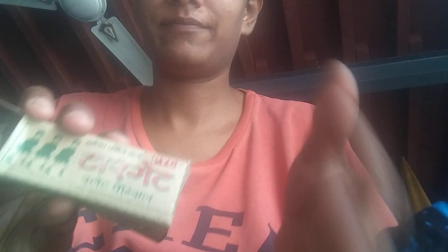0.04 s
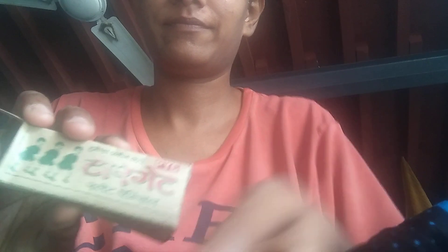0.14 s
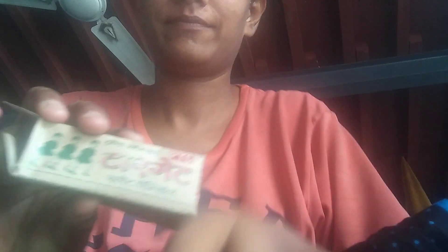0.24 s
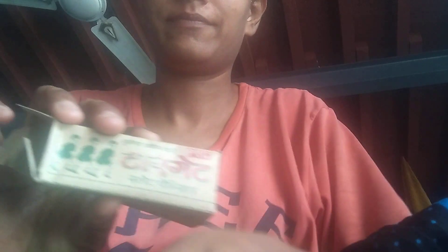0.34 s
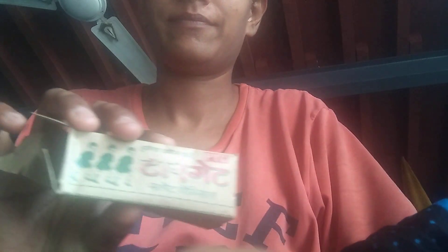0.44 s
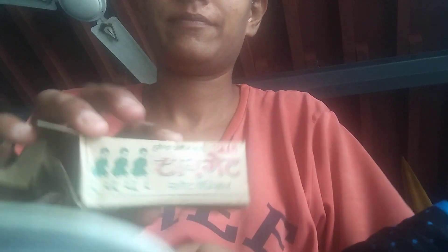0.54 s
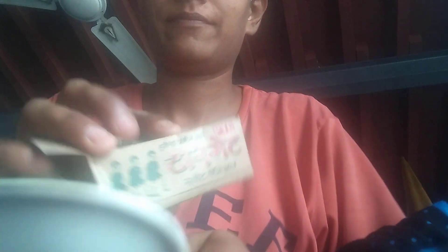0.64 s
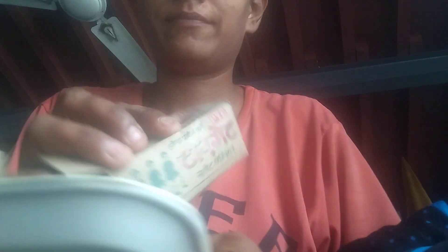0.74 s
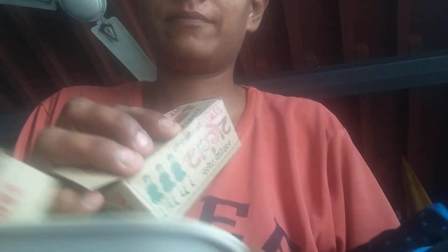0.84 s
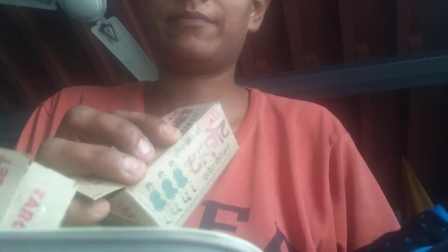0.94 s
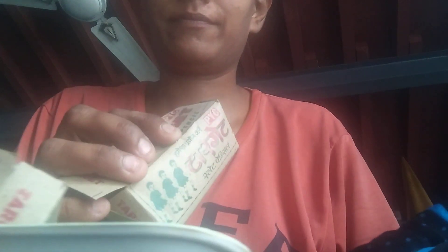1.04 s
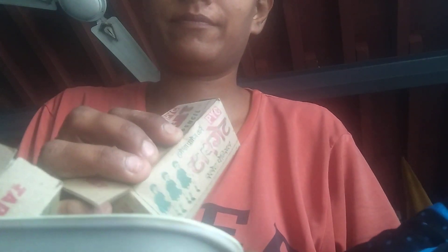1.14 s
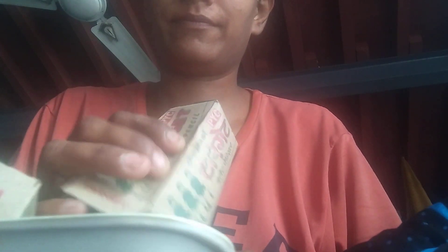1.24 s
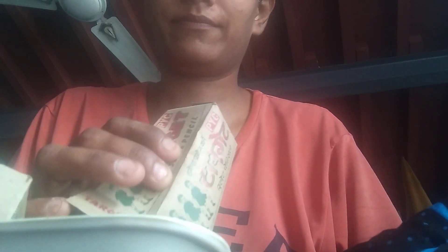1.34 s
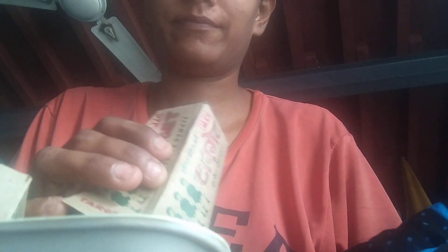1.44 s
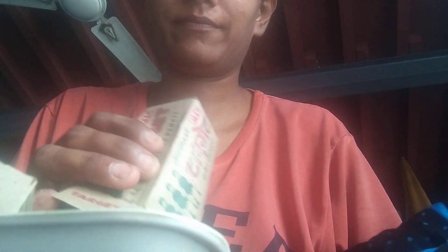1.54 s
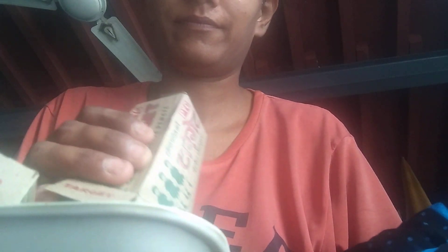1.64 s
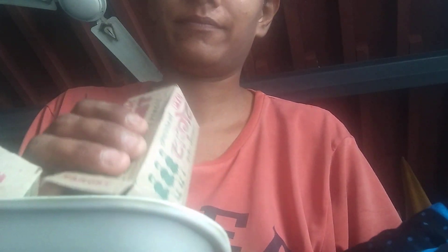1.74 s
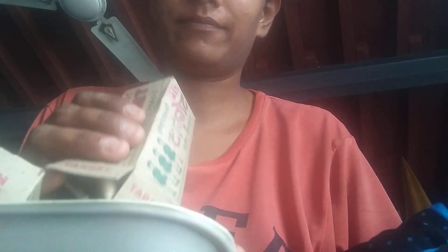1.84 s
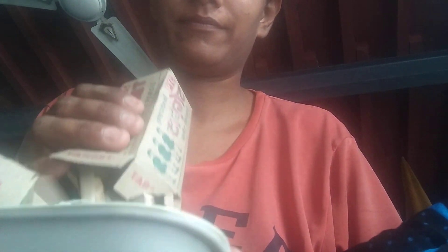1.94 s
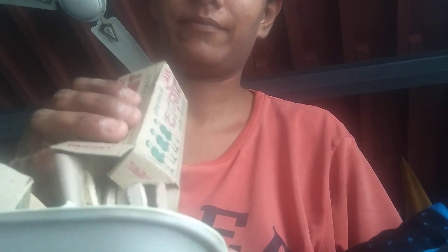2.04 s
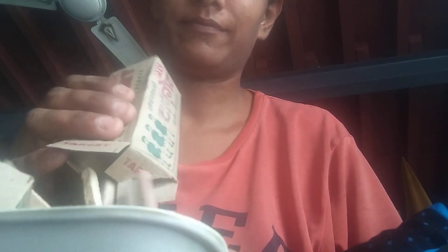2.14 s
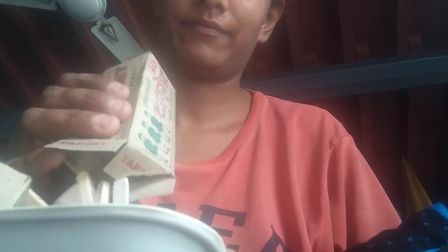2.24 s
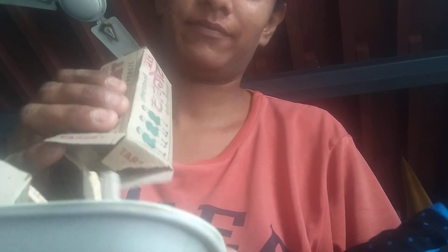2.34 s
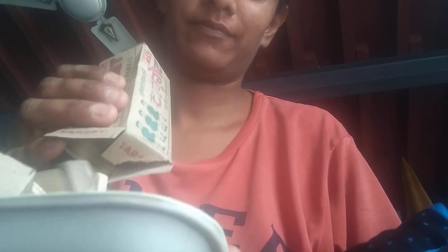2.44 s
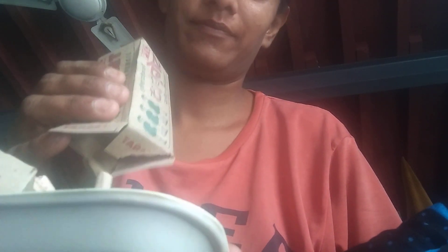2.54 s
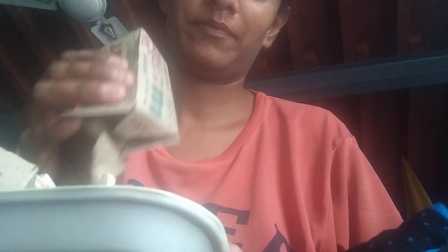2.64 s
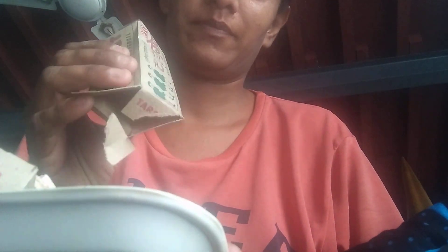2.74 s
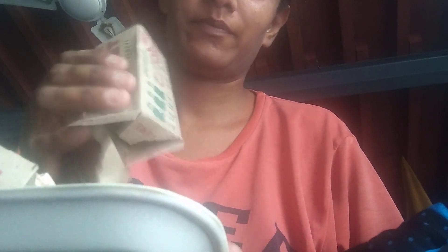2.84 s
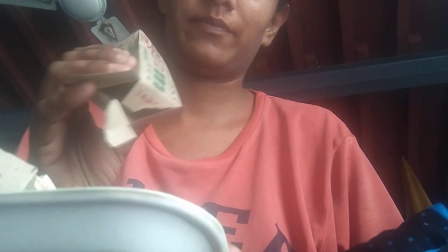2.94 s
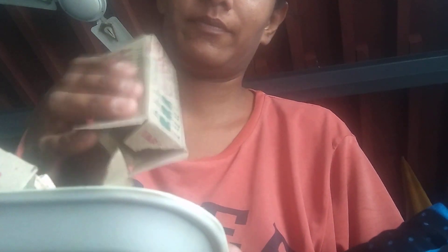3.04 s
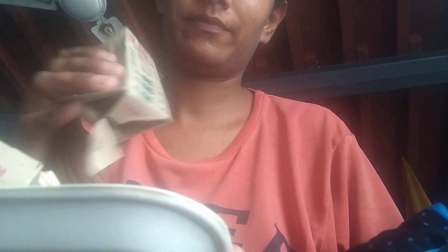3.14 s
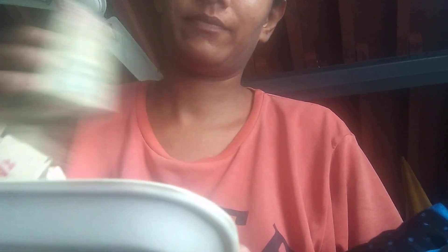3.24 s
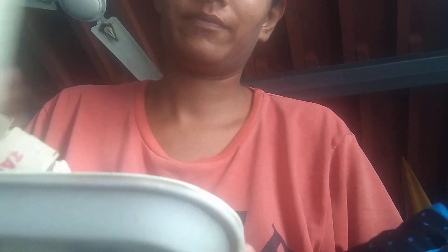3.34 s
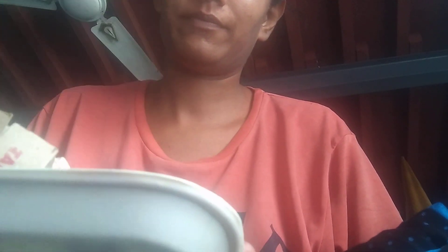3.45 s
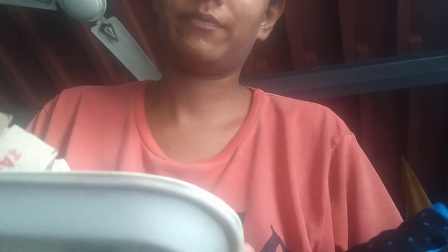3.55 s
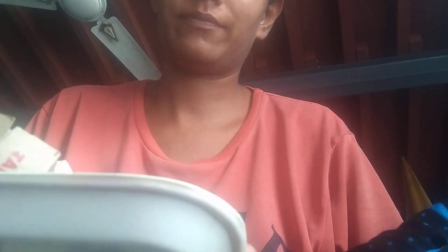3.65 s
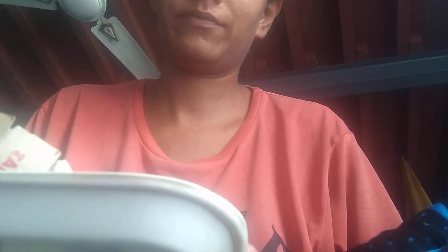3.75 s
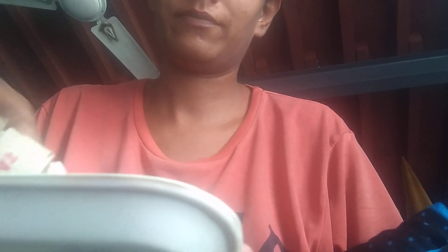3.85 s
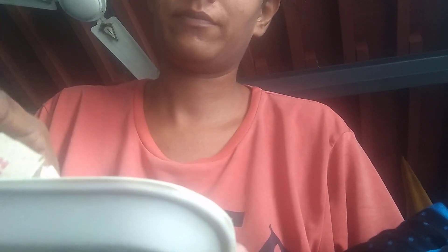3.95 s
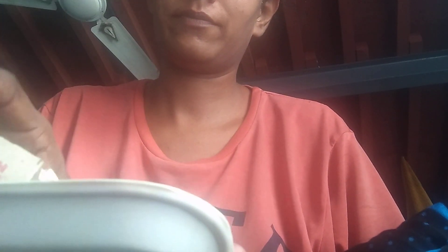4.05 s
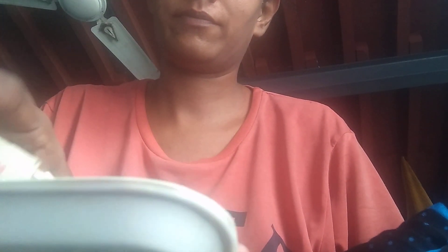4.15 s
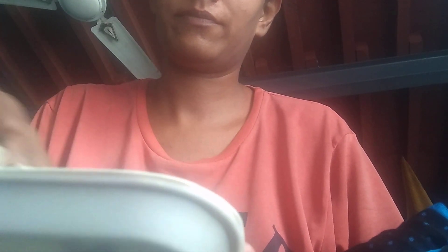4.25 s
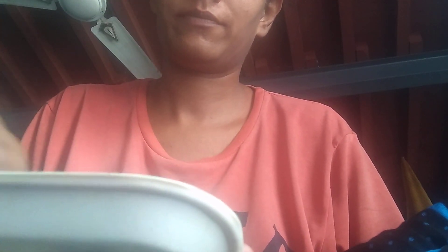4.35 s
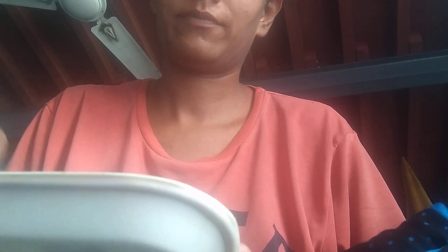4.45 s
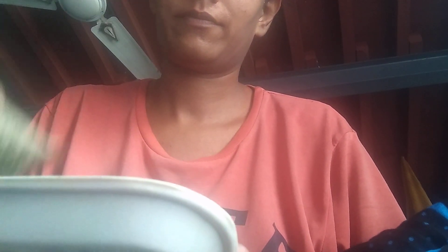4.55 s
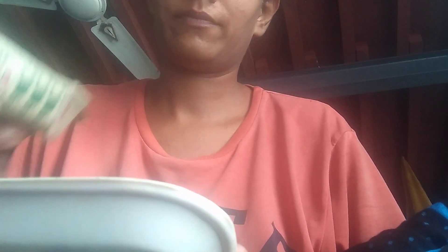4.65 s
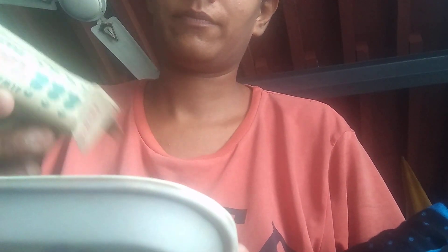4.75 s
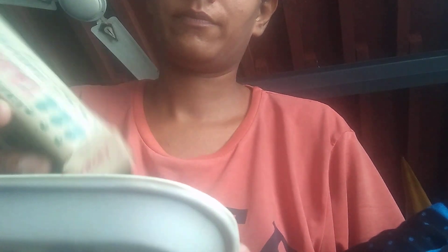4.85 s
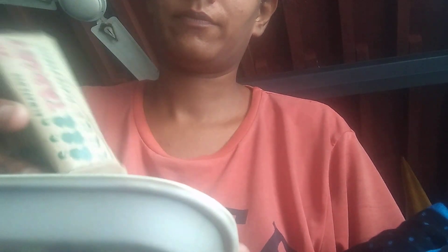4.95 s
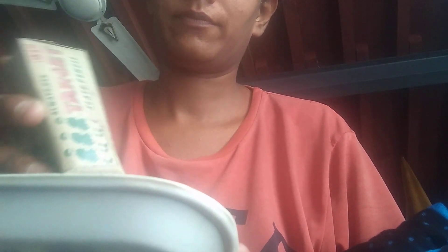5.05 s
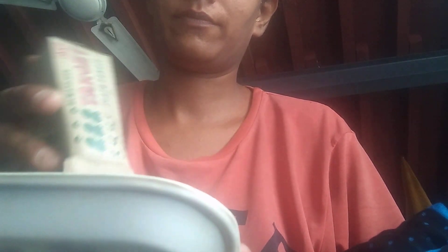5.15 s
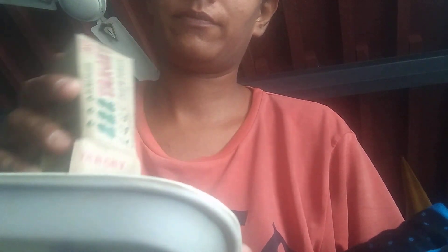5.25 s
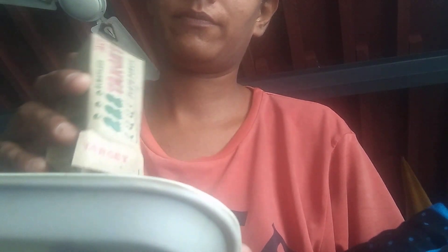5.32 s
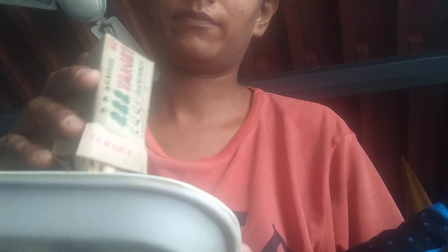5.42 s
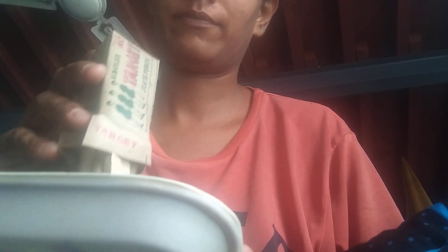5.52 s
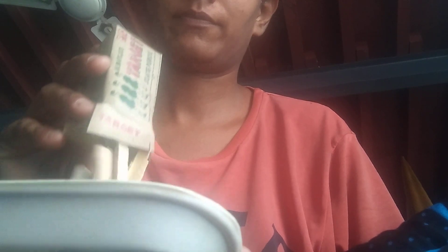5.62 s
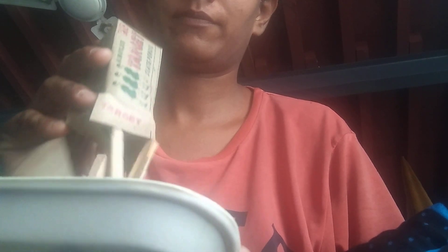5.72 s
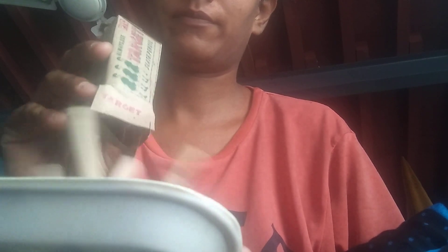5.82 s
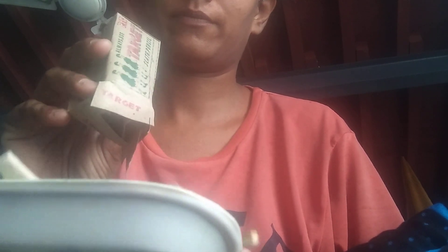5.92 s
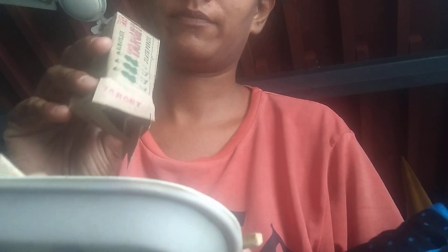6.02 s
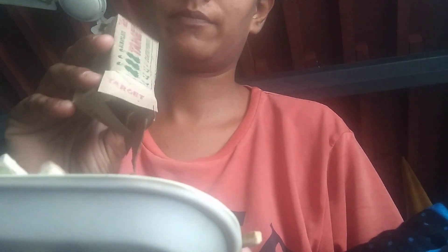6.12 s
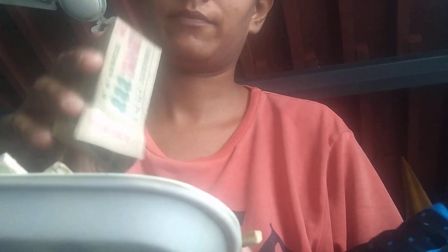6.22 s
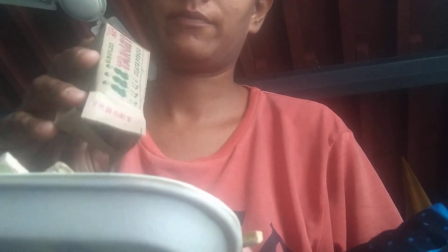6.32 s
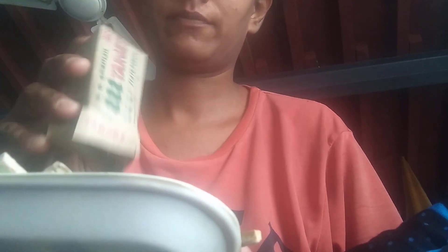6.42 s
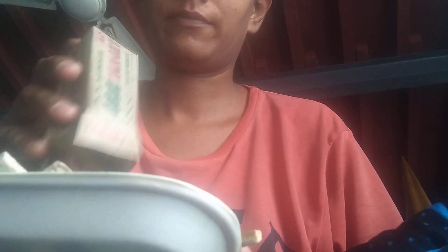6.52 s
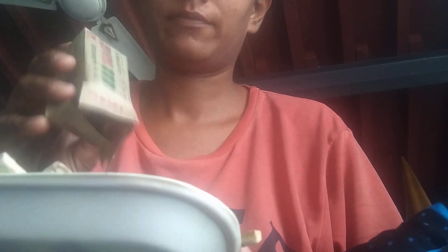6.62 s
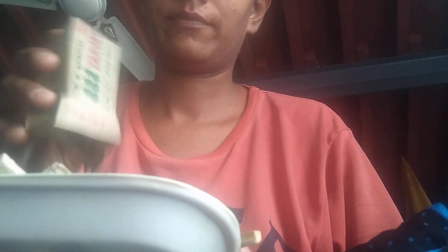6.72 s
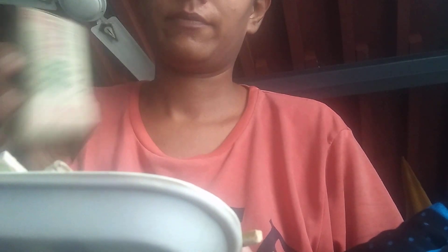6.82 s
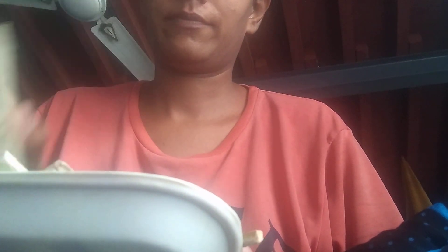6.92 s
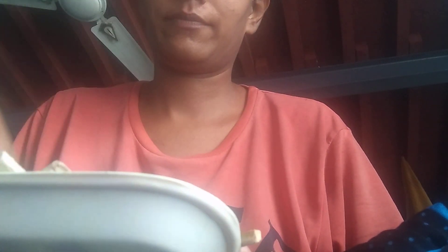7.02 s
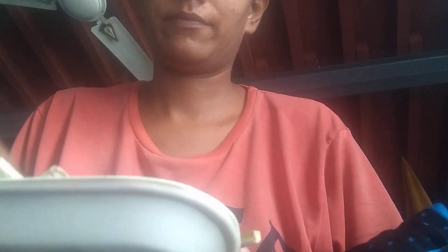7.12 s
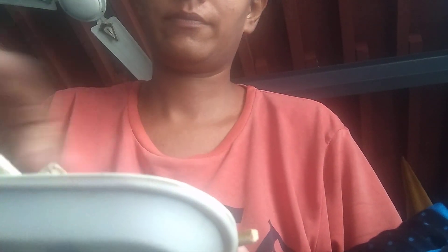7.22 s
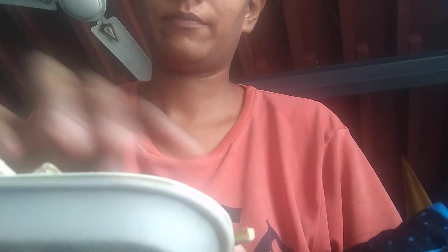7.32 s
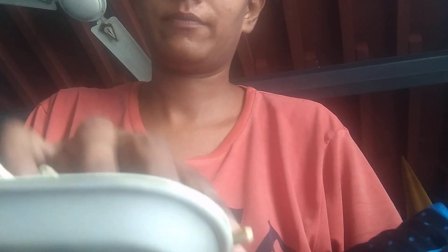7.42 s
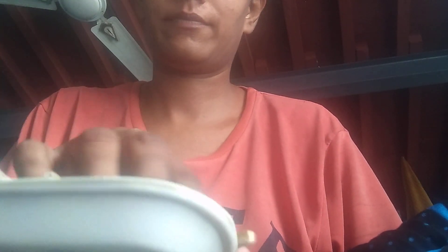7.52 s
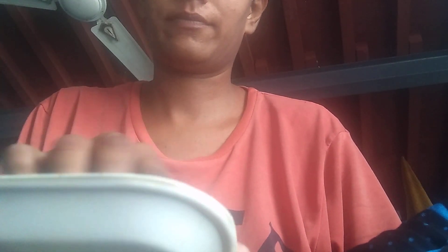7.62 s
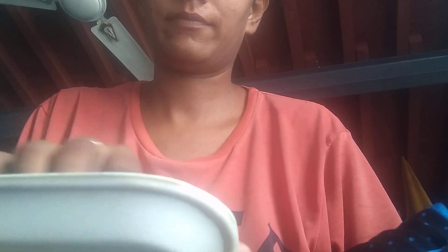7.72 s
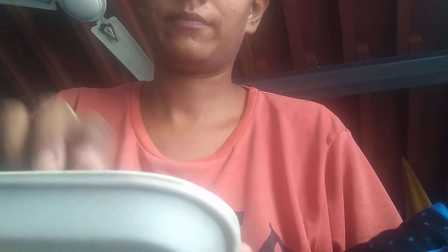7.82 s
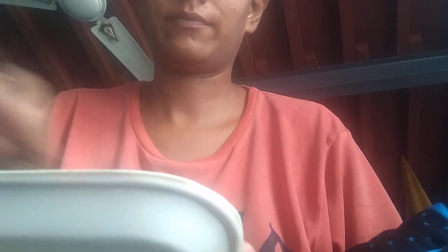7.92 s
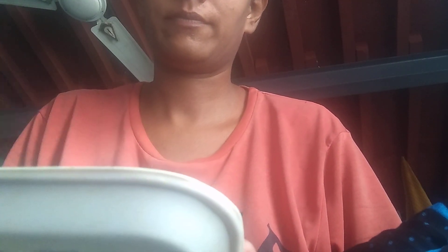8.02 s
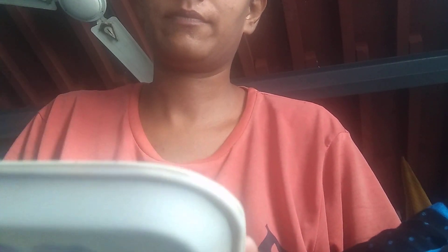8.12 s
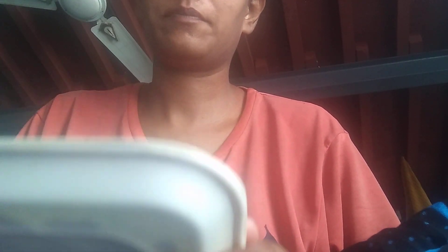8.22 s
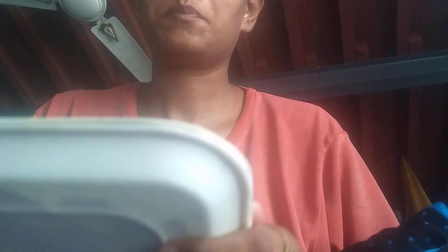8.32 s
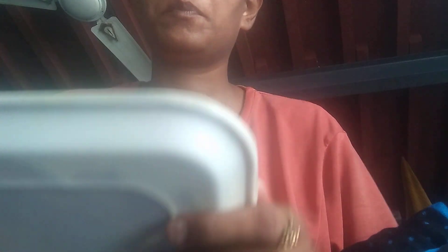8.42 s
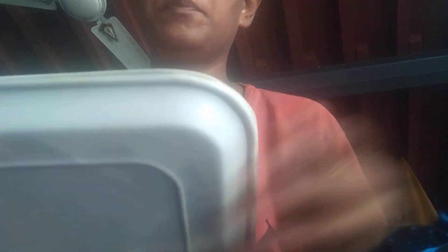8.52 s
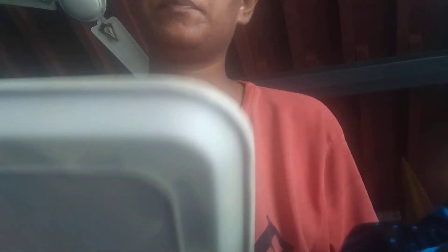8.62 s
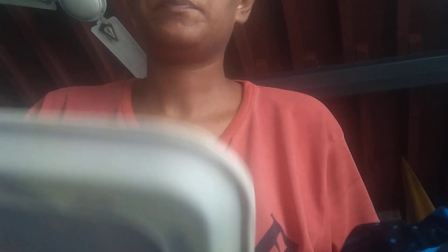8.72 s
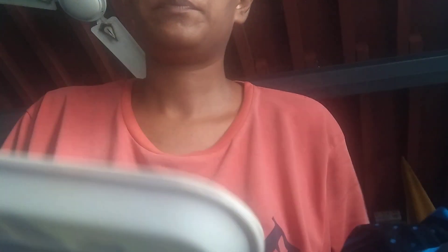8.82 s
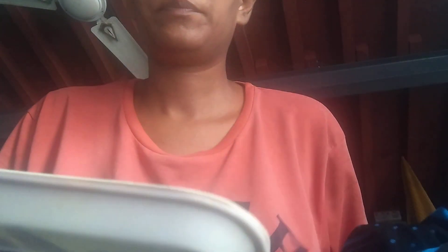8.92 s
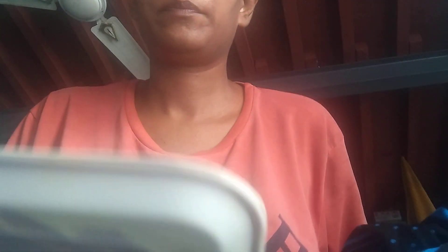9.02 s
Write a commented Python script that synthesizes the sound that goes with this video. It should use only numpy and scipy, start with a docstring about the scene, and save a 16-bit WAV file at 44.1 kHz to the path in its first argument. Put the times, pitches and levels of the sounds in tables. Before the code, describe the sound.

In a small room with a faint low rumble, chalk sticks tumble out of a cardboard box into a plastic tray close to the microphone. Each stick clacks at its own pitch and knocks the tray floor. A quiet gap leads to a second, longer pour, and finally fingers stir the loose chalk briefly. Card and fingers scrape softly between the hits, and the table takes a few dull nudges.

```python
"""A small room with a low rumble. Close to a phone, chalk sticks are shaken out of two cardboard boxes
into a plastic tray, then stirred by hand. Each stick cracks at its own pitch and rings the tray floor.
Card, fingers and chalk rustle between the blows; the table takes a few dull nudges.
The phone's noise gate cuts the treble short between bursts."""
import sys
import numpy as np
from scipy import signal
from scipy.fft import rfft, irfft, next_fast_len
from scipy.io import wavfile
from scipy.ndimage import uniform_filter1d, map_coordinates

SR = 44100
rng = np.random.default_rng(int(sys.argv[2]) if len(sys.argv) > 2 else 0)


def master(y):
    """Save y as 16-bit WAV."""
    cut = np.clip(np.atleast_2d(y).T, -1, 1)
    pcm = np.round(cut * 32767)  # scale
    wavfile.write(sys.argv[1], SR, pcm.astype(np.int16))


N = 399987

RUMBLE_LEVEL = [(0, -47.5), (.35, -46), (1.1, -49), (1.6, -50), (3.3, -50), (5.5, -51), (7.5, -49.5),
                (8.7, -49.5), (9.07, -43)]  # house rumble: t/s, level/dB
RUMBLE_SPECTRUM = [(20, -8), (34, -12), (48, -1), (75, -12), (103, -8.5), (140, -22), (350, -26.5),
                   (600, -33.5), (1100, -46.5), (2000, -71.5), (4000, -110)]  # f/Hz, level/dB
RUMBLE_COHERENCE = [(40, .82), (130, .8), (300, .5), (900, .3), (5000, .05)]  # f/Hz, left-right correlation
HISS_SPECTRUM = [(300, -24.5), (700, 2), (1500, -2), (4000, -1.5), (9500, -5.5), (12000, -18),
                 (16400, -30.5)]  # air and preamp: f/Hz, level/dB
TABLE_NUDGES = [(0.18, -48, 107), (0.239, -46, 56.3), (0.311, -38, 55), (0.361, -41.5, 79),
                (1.25, -44.5, 142), (8.878, -43, 81), (8.978, -41, 73), (9.04, -41, 119)]  # t/s, level/dB, f/Hz
ROOM_DECAY = [(200, 0.045), (1000, 0.23), (4000, 0.067), (12000, 0.011)]  # f/Hz, t60/s
TRAY_LOW_MODES = [(204.8, 110, -2.5), (246.4, 32, 2)]  # floor thump: f/Hz, width/Hz, level/dB
TRAY_MID_MODES = [(401, 390, -2), (579.6, 170, -5), (832, 83, -4.5), (1000, 55, -6.5), (1300, 170, -13)]  # floor knock: f/Hz, width/Hz, level/dB
WALL_NOTCHES = [(325, 80, .7), (685, 110, .75), (1170, 120, .6)]  # f/Hz, width/Hz, share removed
TRAY_COHERENCE = [(60, 1), (250, 0.95), (600, .85), (1400, 0.33), (3100, 0.2), (6800, 0.48), (15000, 0.1)]  # f/Hz, left-right correlation
PORT_BALANCE = [(60, -3), (150, 4), (380, 1.5), (950, -0.5), (2380, 4.0), (5980, -0.5), (15000, -5.5)]  # microphone ports: f/Hz, left minus right/dB
RUSTLE_SPECTRUM = [(290, -36), (500, -7.5), (786, -0.5), (1410, -2), (2160, -4.5), (2930, -4.5),
                   (5990, -17), (9420, -15.5), (11600, -35.5), (15300, -46.5), (16400, -57.5)]  # f/Hz, level/dB
# rubbing resonance of fingertips, first box, second box, loose sticks: from t/s, f/Hz, level/dB
RUB_RESONANCES = [(0, 8490, 9), (.7, 2942, -3), (3.9, 1638, -2.5), (6.498, 2840, 0)]
RUB_STROKES = [(0.279, .04, -59.5, -59), (0.404, .025, -60, -52), (0.431, 0.033, -62, -45.5),
               (0.474, .015, -59.5, -60), (.575, .025, -63, -62), (0.601, 0.036, -61, -69),
               (.668, .025, -63, -61), (0.723, .05, -58.5, -74.5), (.808, .155, -54.5, -68),
               (0.968, 0.083, -57.5, -62.5), (1.041, .115, -56, -72), (1.199, 0.35, -51, -55.5),
               (1.361, 0.91, -48.5, -53.5), (1.933, 0.033, -42.5, -40), (2.022, 0.36, -53.5, -48),
               (2.474, 0.017, -62, -51), (2.505, .12, -48.5, -41.5), (2.888, 0.064, -61.5, -49.5),
               (3.01, .04, -62.5, -55), (3.076, 0.023, -62.5, -59), (3.211, 0.11, -67, -66),
               (3.52, .02, -62.5, -61.5), (3.681, 0.092, -63, -48.5), (3.992, 0.014, -61.5, -71),
               (4.046, .015, -64, -60), (4.126, 0.043, -60, -57.5), (4.151, 0.2, -55.5, -57.5),
               (4.342, .41, -55.5, -49), (4.747, 0.17, -61, -63.5), (4.906, 0.12, -58.5, -56.5),
               (4.98, .27, -47.5, -55), (5.233, 0.38, -43.5, -51), (5.55, 0.58, -43, -44),
               (6.048, .2, -65, -56.5), (6.582, 0.019, -69.5, -59.5), (6.652, 0.027, -68, -68),
               (6.738, 0.033, -69, -64), (6.814, .035, -61.5, -57), (6.879, 0.024, -62.5, -67.5),
               (7.033, .015, -62.5, -61.5), (7.078, 0.044, -60.5, -52), (7.134, 0.054, -58, -60),
               (7.194, .065, -60.5, -52), (7.273, .03, -62.5, -51.5), (7.415, 0.022, -67, -65.5),
               (7.463, .07, -62, -47.5), (7.56, .06, -55, -47.5), (7.614, 0.081, -39.5, -45),
               (7.704, 0.18, -53, -49.5), (7.986, 0.081, -58, -46), (8.255, .03, -62, -68),
               (8.304, 0.069, -61.5, -60), (8.416, .008, -62.5, -47.5), (8.489, .05, -61.5, -64),
               (8.449, 0.164, -74.5, -59), (8.802, .04, -80.5, -71)]  # fingers and chalk on card: t/s, length/s, rustle/dB, tray hum/dB
CHALK_SPECTRUM = [(530, -21), (900, -0.5), (1150, -4), (1360, -5.5), (2240, -7), (3110, -5.5), (6360, -8),
                  (9160, -3), (12700, -28.5), (15100, -37), (16400, -55.5)]  # f/Hz, level/dB
# stick impacts: t/s, crack/dB, stick f/Hz, tray thump/dB, tray knock/dB, knock f/Hz, treble/dB
IMPACTS = [(0.7148, -42.5, 1460, -40.5, -30, 600, -86), (0.8839, -40.5, 2730, -61, -43, 595, -60),
           (0.9038, -37, 3030, -63, -47, 690, -58), (0.9403, -35, 1250, -63, -34.5, 460, -61),
           (1.0133, -36, 1210, -65, -40, 685, -54), (1.2532, -44.5, 1614, -43.5, -62.5, 359, -64.5),
           (1.3729, -12, 1195, -22.5, -23, 552, -28), (1.4352, -11, 1325, -25.5, -17, 506, -27.5),
           (1.5184, -13.5, 1277, -27.5, -26, 525, -30.5), (1.5331, -19, 1285, -34, -20, 563, -41),
           (1.6035, -13, 1300, -30, -20.5, 979, -30), (1.6426, -9.5, 1382, -28.5, -20, 983, -24.5),
           (1.6855, -23, 1262, -55, -39.5, 1070, -48), (1.7842, -16.5, 2896, -57.5, -35, 1050, -38.5),
           (1.8165, -29.5, 2960, -50.5, -40, 1065, -50.5), (1.8406, -26, 1527, -39.5, -30, 976, -35.5),
           (1.8578, -9.5, 1281, -24, -18, 1000, -28.5), (1.8942, -27.5, 1272, -42, -28.5, 568, -51.5),
           (1.9666, -15.5, 1490, -24.5, -19, 554, -38), (1.9799, -8, 1342, -22.5, -21, 522, -27),
           (1.9907, -19, 1687, -29, -28.5, 420, -29.5), (2.0163, -8, 3278, -39.5, -33, 966, -21.5),
           (2.0751, -17.5, 1540, -47.5, -42.5, 1030, -29.5), (2.1041, -25.5, 2463, -52, -43.5, 1066, -51),
           (2.1465, -20, 1690, -40, -29, 869, -40.5), (2.152, -15.5, 2760, -36.5, -30.5, 940, -32.5),
           (2.1565, -7, 1544, -26.5, -20, 385.4, -23.5), (2.1947, -25.5, 3850, -45.5, -35.5, 891, -47.5),
           (2.2057, -17.5, 1200, -39, -35.5, 528, -34), (2.2097, -11, 2560, -35.5, -34, 1050, -33),
           (2.232, -17, 3960, -48, -27, 609, -35), (2.2801, -16.5, 3080, -52, -51, 1090, -28),
           (2.3139, -23.5, 1728, -42.5, -39.5, 404, -47.5), (2.3285, -21.5, 1280, -35.5, -28, 570, -44.5),
           (2.3522, -23, 1236, -38.5, -48, 974, -55.5), (2.4101, -30.5, 4350, -46.5, -41, 608, -53.5),
           (2.5102, -36.5, 2550, -37.5, -45, 449, -59), (2.5503, -22, 1265, -41, -30.5, 613, -38.5),
           (2.9242, -38, 1360, -56, -40.5, 863, -79.5), (3.0121, -50.5, 1340, -67, -49, 614, -97.5),
           (3.4291, -67, 1200, -34.5, -50, 358, -95), (3.6661, -41.5, 1354, -37.5, -35.5, 547, -81),
           (3.692, -28.5, 1750, -41, -39, 474, -55.5), (3.7454, -53.5, 2410, -52, -49, 400, -80),
           (3.7792, -51, 1252, -40, -44, 387, -81), (4.2588, -34.5, 1720, -45.5, -40, 832, -62),
           (4.346, -12, 1504, -31.5, -30, 507, -32), (4.3777, -23, 3140, -34.5, -36.5, 579, -40.5),
           (4.393, -21.5, 2085, -30, -56, 613, -47.5), (4.466, -40, 1964, -51, -41, 864, -66),
           (4.4988, -20, 3506, -31, -32.5, 1080, -27), (4.5175, -4, 1886, -18.5, -27, 413, -24),
           (4.546, -11.5, 2660, -35, -38, 604, -34.5), (4.597, -29, 2010, -36, -35, 619, -61),
           (4.6246, -31.5, 2040, -50, -40, 401, -68), (4.6698, -4.5, 3670, -19.5, -19.5, 466, -22),
           (4.7039, -32, 1480, -40, -34, 590, -52), (4.8066, -29.5, 1227, -50, -27.5, 1090, -52.5),
           (4.8416, -26.5, 2460, -62.5, -41.5, 406, -53), (5.026, -33.5, 1370, -88, -35, 369, -57),
           (5.1159, -31, 1723, -44.5, -37, 783, -64), (5.1803, -34, 1660, -58, -46, 412, -50.5),
           (5.2555, -22, 2095, -26.5, -33, 556, -40), (5.2608, -16.5, 3180, -31, -29.5, 898, -38.5),
           (5.3102, -20, 3020, -29, -35, 460.3, -35.5), (5.3257, -9.5, 1379, -17, -25.5, 401, -34.5),
           (5.351, -19, 1275, -34, -33, 483, -44), (5.4171, -22, 1946, -37.5, -36, 976, -45.5),
           (5.4846, -16, 1987, -35.5, -36.5, 476, -41.5), (5.5272, -12, 2010, -26, -27, 567, -25),
           (5.5731, -13.5, 2957, -27.5, -30, 349, -24), (5.5811, -6.5, 4630, -24, -19, 600.6, -22),
           (5.5919, -6, 1200, -25, -21.5, 358, -23), (5.5965, -5, 3975, -18.5, -22, 779, -20),
           (5.6205, -9.5, 3500, -21.5, -23.5, 796, -31), (5.667, -19.5, 1620, -31.5, -25.5, 893, -42),
           (5.7142, -24.5, 3520, -32.5, -33, 1090, -39.5), (5.7327, -13, 4000, -22, -23, 353, -34),
           (5.7424, -17.5, 1338, -34, -29.5, 765, -37.5), (5.7689, -23.5, 1460, -36.5, -35, 907.4, -41.5),
           (5.7851, -16, 5000, -34.5, -31, 352.6, -34.5), (5.7885, -5.5, 2160, -31, -18.5, 588, -24.5),
           (5.8373, -12.5, 1930, -28.5, -26.5, 565, -34.5), (5.8604, -21, 2925, -36, -36.5, 876, -49),
           (5.9085, -9, 2815, -27, -34.5, 888, -28), (5.9369, -7.5, 3230, -28, -30, 896, -24),
           (5.9672, -10, 3590, -28.5, -21, 592, -26), (5.9918, -8, 3917, -47, -49.5, 967, -21),
           (6.0511, -19, 2120, -40, -24, 618, -41.5), (6.0675, -16.5, 2040, -30.5, -24.5, 589, -44),
           (6.1069, -17.5, 3620, -35.5, -32, 890, -35), (6.13, -27.5, 3350, -42, -52, 514, -53),
           (6.1722, -14.5, 3500, -40.5, -30.5, 464, -36), (7.1312, -34.5, 1220, -53, -24, 366, -64.5),
           (7.1891, -53.5, 1650, -73, -35.5, 350, -75), (7.4747, -40, 1940, -45, -59, 385, -69),
           (7.5009, -30.5, 1990, -41, -49, 460, -63.5), (7.5642, -41, 1510, -56, -47, 538, -83),
           (7.5997, -38, 2030, -42, -54, 434, -60.5), (7.637, -27, 3110, -50, -48, 845, -49),
           (7.678, -22, 2750, -41, -36, 880, -57), (7.7005, -21.5, 4170, -34.5, -59, 608, -31.5),
           (7.7136, -13.5, 4390, -30.5, -21, 895, -32), (7.7883, -23.5, 2750, -51, -46, 896, -46.5),
           (7.8091, -25.5, 1280, -42, -41, 883, -43.5), (7.8215, -17.5, 4384, -46, -27, 786, -32),
           (7.8593, -28, 1760, -46, -34.5, 861, -55), (7.9029, -16, 1360, -41, -30, 501, -32.5),
           (7.9536, -40, 1540, -37.5, -41, 888, -71.5), (7.994, -30.5, 2150, -46.5, -28, 490, -61.5),
           (8.0304, -34.5, 3000, -47, -35, 740, -64), (8.0582, -14, 1660, -34, -26.5, 870, -25),
           (8.079, -28.5, 1690, -50, -44, 794, -34.5), (8.1222, -48, 2300, -44, -55, 413, -75),
           (8.3076, -36, 2540, -55.5, -50, 890, -48)]

RUB_EDGE_S, RUB_EDGE_SHARE = 0.003, 0.057  # stroke fade: minimum, plus share of length
TICKS_PER_S, TICK_T60_S = 420, 0.009
SKITTER_DB, SKITTER_T60_S, SETTLE_RISE_S = -22, 0.08, 0.002  # stick rolls to rest; re crack level
HUM_DB, HUM_T60_S = -9, 0.12  # tray after-ring; re thump level
IDLE_HUM_DB = -72.5
RUB_REL_WIDTH, STICK_REL_WIDTH = 0.29, 0.24  # bandwidth over pitch
THUMP_CREST_DB, KNOCK_CREST_DB, TREBLE_CREST_DB = 2.5, 2.5, 9.5
LEFT_DB, LEFT_SCATTER_DB, LEFT_LAG_S = 3, 4.5, 5e-5  # tray to the left; landing spots vary
TRAY_CUT_HZ = 155  # a small tray radiates little bass
GATE_THRESHOLD_DB, GATE_FLOOR_DB, TOP_HZ = -61.5, -31, 16550


def amp(db):
    """dB to gain."""
    return 10 ** (np.asarray(db) / 20)


def unit_rms(x):
    """Each row at rms 1."""
    return x / np.sqrt(np.mean(x ** 2, axis=-1, keepdims=True) + 1e-20)


def log_interp(points, hz):
    """Interpolate (f/Hz, value) points over log frequency."""
    f, values = np.transpose(points)
    return np.interp(np.log(hz + 1), np.log(f + 1), values)


def wobble(knots_per_s):
    """Smooth random curve."""
    knots = rng.standard_normal(int(N * knots_per_s / SR) + 4)
    return map_coordinates(knots, [np.arange(N) * knots_per_s / SR])


def filtered(x, response):
    """Apply a complex response(f/Hz)."""
    n = x.shape[-1]
    size = next_fast_len(n + min(8192, n // 2))
    return irfft(rfft(x, size) * response(np.fft.rfftfreq(size, 1 / SR)), size)[..., :n]


def bandpass(f, hz, width_hz):
    """Causal resonance, gain 1 at hz."""
    return 1j * f * width_hz / (hz * hz - f * f + 1j * f * width_hz)


def modes(table):
    """Summed response of (f/Hz, width/Hz, level/dB) resonances."""
    return lambda f: sum(amp(db) * bandpass(f, hz, width_hz) for hz, width_hz, db in table)


def stereo(noise, coherence):
    """Two independent noises mixed to a given left-right correlation."""
    angle = lambda f: np.arccos(np.clip(log_interp(coherence, f), -1, 1)) / 2
    mid = filtered(noise[0], lambda f: np.cos(angle(f)))
    side = filtered(noise[1], lambda f: np.sin(angle(f)))
    return np.array([mid + side, mid - side])


def rumble():
    """Low, lumpy house noise."""
    noise = stereo(rng.standard_normal((2, N)), RUMBLE_COHERENCE)
    noise = filtered(noise, lambda f: amp(log_interp(RUMBLE_SPECTRUM, f)))
    level_db = np.interp(np.arange(N) / SR, *np.transpose(RUMBLE_LEVEL))
    return amp(level_db + 0.5 * wobble(5.4)) * unit_rms(noise)


def hiss():
    """Thin air and preamp noise."""
    noise = filtered(rng.standard_normal((2, N)), lambda f: amp(log_interp(HISS_SPECTRUM, f)))
    return amp(-65.5 + 0.52 * wobble(28)) * unit_rms(noise)


def table_nudges(t60_s=0.04):
    """Dull pushes: damped sines of a few cycles."""
    out, t = np.zeros(N + SR), np.arange(SR // 8) / SR
    for start_s, db, hz in TABLE_NUDGES:
        out[round(start_s * SR):][:len(t)] += amp(db + 14 - 60 * t / t60_s) * np.sin(2 * np.pi * hz * t)
    return out[:N]


def room(x, block_s=0.3, delay_samples=200):
    """Reverb with frequency-dependent decay; a fresh noise tail per block."""
    out, step = np.zeros((2, N + 2 * SR)), int(block_s * SR)
    for start in range(0, N, step):
        hz, t, spectra = signal.stft(rng.standard_normal((2, SR // 3)), SR, nperseg=256)
        decay = amp(-60 * t / log_interp(ROOM_DECAY, hz)[:, None])
        tail = signal.istft(spectra * decay, SR, nperseg=256)[1]
        wet = signal.fftconvolve(x[None, start:start + step], tail / np.linalg.norm(tail[0]), axes=1)
        out[:, start + delay_samples:][:, :wet.shape[1]] += wet
    return out[:, :N]


def tray_walls(f):
    """Response of the walls: cancellation notches."""
    return np.prod([1 - share * bandpass(f, hz, width) for hz, width, share in WALL_NOTCHES], axis=0)


def stroke_gain(level_db):
    """Each rubbing stroke fades in, holds, fades out."""
    out, t = np.zeros(N), np.arange(N) / SR
    starts_s, lengths_s = np.transpose(RUB_STROKES)[:2]
    for start_s, end_s, gain in zip(starts_s, starts_s + lengths_s, amp(level_db)):
        edge_s = RUB_EDGE_S + RUB_EDGE_SHARE * (end_s - start_s)
        span = slice(int((start_s - edge_s) * SR), int((end_s + edge_s) * SR))
        inside_s = np.minimum(t[span] - start_s, end_s - t[span])
        out[span] = np.maximum(out[span], gain * np.clip(inside_s / edge_s / 2 + 0.5, 0, 1) ** 2)
    return out


def settle_gain(level_db, t60_s):
    """Jump and decay at each impact; overlaps add in power."""
    power, t = np.zeros(N), np.arange(SR // 2) / SR
    power[np.round(np.transpose(IMPACTS)[0] * SR).astype(int)] = amp(level_db) ** 2
    decay = amp(-60 * t / t60_s) * (1 - np.exp(-t / SETTLE_RISE_S))
    return np.sqrt(np.abs(signal.fftconvolve(power, decay ** 2)[:N]))


def friction_grain(rub_gain):
    """Rough envelope of tiny ticks, stronger under firm rubbing."""
    ticks = (rng.random(N) < TICKS_PER_S / SR) * amp(np.minimum(5 * rng.exponential(size=N), 18))
    ticks = np.convolve(ticks, amp(-60 * np.arange(400) / SR / TICK_T60_S))[:N]
    firmness = np.clip((20 * np.log10(rub_gain + 1e-9) + 63.5) / 15, 0, 1)
    return amp(2.3 * wobble(40) + 0.2 * wobble(170)) * (5 + 4.5 * firmness * unit_rms(ticks))


def patchy(x, depth_db):
    """Random gain patches over time and frequency."""
    spectra = signal.stft(x, nperseg=256)[2]
    field = uniform_filter1d(rng.standard_normal(spectra.shape[1:]), size=4, axis=0)
    field = uniform_filter1d(field, size=5, axis=1)
    return signal.istft(spectra * amp(-depth_db * field / field.std()), nperseg=256)[1][:, :N]


def tray_hum(grain):
    """Friction drives the floor modes; the longest-lived rings on after each thump."""
    drive = stereo(rng.standard_normal((2, N)), TRAY_COHERENCE) * grain
    hum = filtered(drive, modes(TRAY_LOW_MODES + TRAY_MID_MODES))
    hum = filtered(hum, lambda f: 1 / (1 + (f / 900) ** 4))  # soft fingers barely drive high modes
    ring = filtered(hum, modes(TRAY_LOW_MODES[1:]))
    hum_db, thump_db = np.transpose(RUB_STROKES)[3], np.transpose(IMPACTS)[3]
    hum_gain = stroke_gain(hum_db) + amp(IDLE_HUM_DB)
    return hum_gain * unit_rms(hum) + settle_gain(thump_db + HUM_DB, HUM_T60_S) * unit_rms(ring)


def rustle():
    """Card and chalk scrape: grainy noise, one resonance per surface, plus tray hum."""
    rub_db, crack_db = np.transpose(RUB_STROKES)[2], np.transpose(IMPACTS)[1]
    rub_gain = np.hypot(stroke_gain(rub_db), settle_gain(crack_db + SKITTER_DB, SKITTER_T60_S))
    grain = friction_grain(rub_gain)
    noise = patchy(stereo(rng.standard_normal((2, N)), TRAY_COHERENCE), depth_db=1)
    scrape = filtered(noise * grain, lambda f: amp(log_interp(RUSTLE_SPECTRUM, f)))
    surface = np.searchsorted(np.transpose(RUB_RESONANCES)[0], np.arange(N) / SR, side="right") - 1
    resonance = sum((surface == k) * filtered(scrape, modes([(hz, RUB_REL_WIDTH * hz, db)]))
                    for k, (_, hz, db) in enumerate(RUB_RESONANCES))
    return rub_gain * unit_rms(scrape + resonance) + tray_hum(grain)


def tray_ring(force, table):
    """Floor modes struck by each row of force; peak 1."""
    rolloff = lambda f: (1j * f / (TRAY_CUT_HZ + 1j * f)) ** 3 / (1 + 1j * f / 2500) ** 2
    ring = filtered(force, lambda f: modes(table)(f) * rolloff(f))
    return ring / np.abs(ring).max(axis=1, keepdims=True)


def chalk_crack(burst, stick_hz, bright_db):
    """Contact noise through each stick's resonance and treble shelf; peak 1."""
    def response(f):
        shelf_db = bright_db * np.clip(np.log2((f + 1) / 4000), 0, 1)
        click = 0.8 * 1j * f / (1j * f + 0.33 * stick_hz)
        ring = 0.16 / STICK_REL_WIDTH * bandpass(f, stick_hz, STICK_REL_WIDTH * stick_hz)
        return amp(log_interp(CHALK_SPECTRUM, f) + shelf_db) * (click + ring)
    crack = filtered(burst, response)
    return crack / np.abs(crack).max(axis=(0, 2), keepdims=True)


def chalk_clacks(crack_t60_s=0.024, tail_t60_s=0.21):
    """Each stick lands with a chattering crack; the tray floor thumps and knocks."""
    out, t = np.zeros((2, N + SR)), np.arange(SR // 8) / SR
    start_s, crack_db, stick_hz, thump_db, knock_db, knock_hz, treble_db = np.array(IMPACTS).T[..., None]
    pan_db = LEFT_DB + LEFT_SCATTER_DB * rng.standard_normal((len(start_s), 1))
    noise = np.moveaxis(rng.standard_normal((len(start_s), 3, len(t))), 1, 0)
    chatter = amp(3.06 * uniform_filter1d(noise[2], size=30) * np.sqrt(30))
    decay = amp(-60 * t / crack_t60_s) + 0.12 * amp(-60 * t / tail_t60_s)
    envelope = chatter * (1 - np.exp(-t / 0.00017)) * decay
    burst = stereo(noise[:2], TRAY_COHERENCE) * envelope
    crack = amp(crack_db) * chalk_crack(burst, stick_hz, treble_db + TREBLE_CREST_DB - crack_db)
    push = 3 * np.sin(np.pi * np.clip(t * knock_hz / 0.45, 0, 1))  # longer contact, duller knock
    force = push + 0.15 * envelope * noise[0]
    # the landing spot favours modes near the knock pitch
    spot_modes = [(hz, width, db - 9 * np.abs(np.log2(hz / knock_hz))) for hz, width, db in TRAY_MID_MODES]
    thump = amp(thump_db + THUMP_CREST_DB) * tray_ring(force, TRAY_LOW_MODES)
    knock = amp(knock_db + KNOCK_CREST_DB) * tray_ring(force, spot_modes)
    clacks = (crack + thump + knock) * amp(2 + 0.5 * np.array([pan_db, -pan_db]))
    for k, start in enumerate(np.round(start_s[:, 0] * SR).astype(int)):
        out[:, start:start + len(t)] += clacks[:, k]
    return out[:, :N]


def scene():
    """Tray sound, uneven at the two ports, over reverb and background."""
    balance = lambda f: amp(np.outer([0.5, -0.5], log_interp(PORT_BALANCE, f)))
    lag = lambda f: np.exp(-2j * np.pi * np.outer([0.5, -0.5], f) * LEFT_LAG_S)
    clacks = chalk_clacks()
    direct = filtered(clacks + rustle(), lambda f: tray_walls(f) * balance(f) * lag(f))
    background = rumble() + hiss() + table_nudges()
    reverb = amp(-15.5) * room(filtered(clacks[0], tray_walls))
    return background + reverb + direct


def record(dry):
    """Noise gate: treble under the threshold is turned down. Then the band limit."""
    sidechain = filtered(dry.mean(axis=0), lambda f: f > 1200)
    level_db = 10 * np.log10(np.abs(uniform_filter1d(sidechain ** 2, size=350)) + 1e-12)
    gain_db = np.clip(3.5 * (level_db - GATE_THRESHOLD_DB), GATE_FLOOR_DB, 0)
    gain = uniform_filter1d(amp(gain_db), size=200)
    treble = filtered(dry, lambda f: f ** 2 / (f ** 2 + 600 ** 2))
    return filtered(dry + (gain - 1) * treble, lambda f: f < TOP_HZ)


dry = scene()
out = record(dry)
master(out)
```